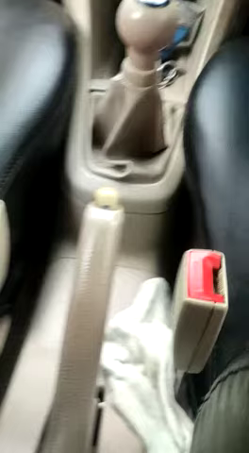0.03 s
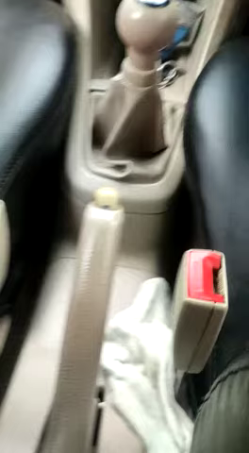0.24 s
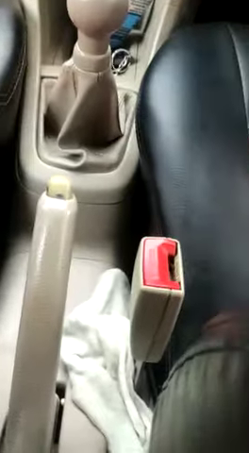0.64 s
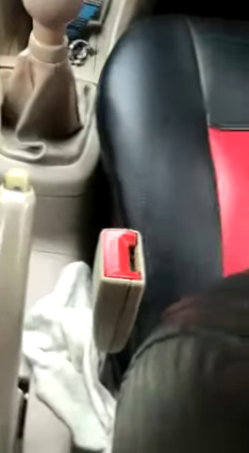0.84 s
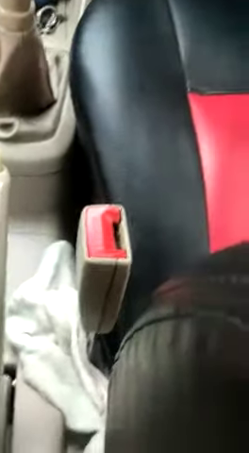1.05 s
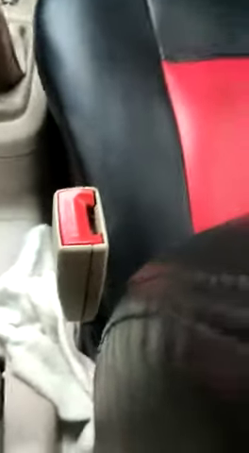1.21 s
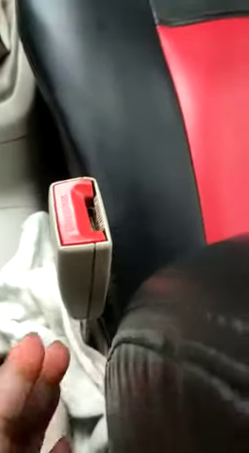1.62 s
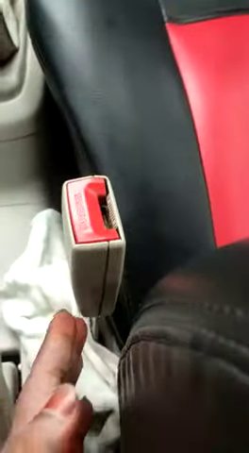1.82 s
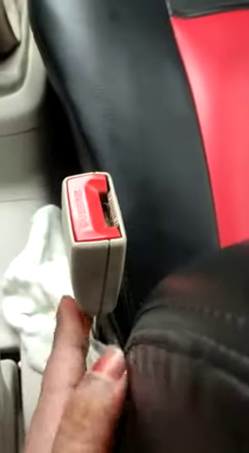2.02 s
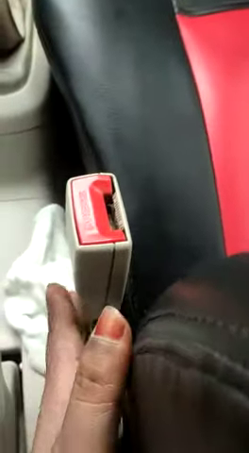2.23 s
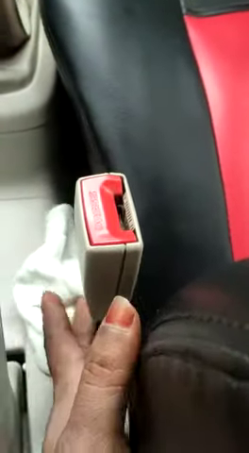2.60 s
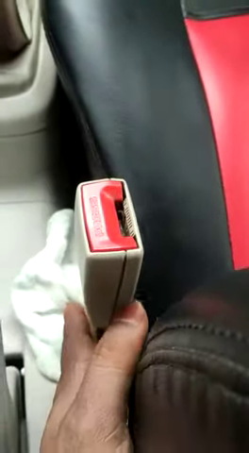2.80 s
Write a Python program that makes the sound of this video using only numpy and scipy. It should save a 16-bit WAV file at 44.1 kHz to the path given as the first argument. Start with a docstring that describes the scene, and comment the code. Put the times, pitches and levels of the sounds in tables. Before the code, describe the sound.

Soft, very close handling of a seat belt buckle inside a car. The hand-held microphone pops on, cloth and skin rub the seat, trim is knocked, the cushion thumps, and a small click ends it over faint hiss.

```python
"""A hand-held microphone pops on; then, very close, a hand reaches for a seat belt buckle in a parked car.
A sleeve hisses over the seat, skin rubs, damped trim is knocked, the cushion is bumped and a finger
sticks and slips down the plastic housing. The buckle ticks, then clicks against its stalk, which hums.
Under it all lie a quiet cabin hiss and the low sway of the microphone."""
import sys
import numpy as np
from scipy import signal
from scipy.fft import rfft
from scipy.io import wavfile

SR = 44100
rng = np.random.default_rng(int(sys.argv[2]) if len(sys.argv) > 2 else 0)


def digitize_waveform(pressure):
    """Quantize a signal to 16-bit integers and store it at the path in sys.argv[1].

    Rows of a 2-D input are taken as channels; values are limited to [-1, 1].
    """
    field = np.atleast_2d(pressure).T
    bounded = np.clip(field, -1, 1)
    quanta = np.round(bounded * 32767).astype(np.int16)
    wavfile.write(sys.argv[1], SR, quanta)


N = 130095
TIME = np.arange(N) / SR


def from_db(db):
    """Decibels to gain."""
    return 10 ** (np.asarray(db) / 20)


def rms_one(x):
    """Scale to unit rms."""
    return x / np.sqrt(np.mean(x ** 2) + 1e-20)


def fader(points):
    """Gain over time from (time_s, level_db) points."""
    return from_db(np.interp(TIME, *np.transpose(points)))


def filtered(x, hz, kind, order=2):
    """Butterworth filter."""
    return signal.sosfilt(signal.butter(order, hz, kind, fs=SR, output="sos"), x + 1e-18)


def resonance(x, hz, q):
    """The band of x around one resonant peak."""
    return signal.lfilter(*signal.iirpeak(hz, q, fs=SR), x)


def steep_cut(x, hz):
    """Remove everything above hz."""
    taps = signal.firwin(301, hz, window=("kaiser", 8), fs=SR)
    return signal.fftconvolve(x, taps[None], mode="same")


def coloured(x, eq):
    """Shape x with (freq_hz, gain_db) points and roll off the bass below them; unit rms."""
    hz, db = np.transpose(eq)
    freqs = np.maximum(np.arange(N // 2 + 1) * SR / N, 1)
    gain = from_db(np.interp(np.log(freqs), np.log(hz), db))
    gain /= np.sqrt(1 + (hz[0] / 2 / freqs) ** 4)
    return rms_one(np.fft.irfft(rfft(x) * gain, N))


def drift(hz):
    """Slow random motion of unit rms."""
    return rms_one(filtered(rng.standard_normal(N + SR), hz, "low")[SR:])


def age(start_s):
    """Seconds since a contact, zero before it."""
    return np.maximum(TIME - start_s, 0)


def ring(start_s, hz, t60_s):
    """A struck, damped sine."""
    t = age(start_s)
    return np.sin(2 * np.pi * hz * t) * np.exp(-np.minimum(np.log(1000) * t / t60_s, 20))


def burst(start_s, decay_s):
    """Noise that starts sharply and dies away."""
    return rng.standard_normal(N) * (TIME >= start_s) * np.exp(-np.minimum(age(start_s) / decay_s, 20))


def cabin(hiss_db=-74.5, hollow_db=-78.5):
    """Room tone: a steady hiss with a faint hollow resonance of the cabin."""
    # colour of the hiss: freq_hz, gain_db
    eq = [(100, 0.5), (250, -5), (400, -3), (500, -12), (620, -16.5), (1000, -12), (1500, -20), (4000, -20),
          (8000, -30)]
    hollow = rms_one(resonance(rng.standard_normal(N), hz=459, q=8.3))
    hiss = coloured(rng.standard_normal(N), eq)
    return from_db(hiss_db) * hiss + from_db(hollow_db) * hollow


def handling(sway_db=-41, fade_db_per_s=4.5):
    """The microphone sways, less as the hand settles, and the grip rumbles through its body."""
    # swells of the rumble: time_s, level_db
    envelope = [(.41, -72.5), (.5, -69), (.76, -67), (.82, -63), (.95, -70), (1.08, -58.5), (1.3, -68.5),
                (1.52, -60), (1.72, -62), (1.95, -69.5), (2.05, -68.5), (2.35, -68), (2.52, -66.5),
                (2.64, -59.5), (2.77, -68), (2.87, -55.5), (2.95, -69)]
    # colour of the rumble: freq_hz, gain_db
    eq = [(40, 6.5), (70, 2.5), (140, -0.5), (220, -15), (400, -28.5), (1000, -59.5)]
    sway = filtered(drift(hz=13), 5.57, "high")
    sway = rms_one(filtered(sway, 28, "low", order=3))
    rumble = fader(envelope) * coloured(rng.standard_normal(N), eq)
    return from_db(sway_db - fade_db_per_s * TIME) * sway + rumble


def sleeve(creases_per_s=430, crease_db=-9, spread_db=7.5, gain_db=0.5):
    """Fibres hiss and tiny creases snap as the cloth slides over the seat."""
    # strokes of the sleeve: time_s, level_db
    envelope = [(.41, -81), (.45, -93), (.55, -83), (.605, -66.5), (.68, -72.5), (.75, -64.5), (.81, -80),
                (.86, -76.5), (.93, -76.5), (1.02, -84), (1.048, -67.5), (1.09, -66.5), (1.18, -67.5),
                (1.26, -75), (1.4, -64), (1.47, -65), (1.53, -74.5), (1.66, -80), (1.85, -78.5), (2.0, -84),
                (2.16, -76.5), (2.5, -87), (2.68, -78), (2.95, -83)]
    # colour of the cloth: freq_hz, gain_db
    eq = [(300, 0.5), (700, -2), (1300, -2), (2200, -1), (4000, 2.5), (5500, -1), (7200, -3.5), (9000, -2)]
    creases = (rng.random(N) < creases_per_s / SR) * rng.choice([-1, 1], N)
    strength = from_db(spread_db * np.minimum(rng.exponential(1, N), 4))
    friction = rng.standard_normal(N) + from_db(crease_db) * rms_one(creases * strength)
    return from_db(gain_db) * fader(envelope) * coloured(friction, eq)


def rubbing(grain_db=2.5, flutter_hz=45):
    """Skin drags unevenly, dull and grainy."""
    # strokes of the hand: time_s, level_db
    envelope = [(.41, -70.5), (.52, -69), (.66, -61.5), (.77, -72), (.86, -60), (.95, -66), (1.07, -64),
                (1.3, -66.5), (1.44, -65), (1.58, -66.5), (1.74, -73.5), (1.97, -76), (2.1, -69.5),
                (2.36, -69), (2.52, -75.5), (2.66, -69.5), (2.79, -74), (2.95, -74.5)]
    # colour of the rub: freq_hz, gain_db
    eq = [(130, -2.5), (220, -2.5), (420, 0.5), (650, -5.5), (1000, -11.5), (1500, -18.5), (2200, -15),
          (4000, -29), (8000, -31.5)]
    friction = rng.standard_normal(N) * from_db(grain_db * drift(flutter_hz))
    return fader(envelope) * coloured(friction, eq)


def brushes(grain_db=3, flutter_hz=90):
    """Fingertips pass over grained plastic in short, rough swells."""
    # bell-shaped strokes on the housing: centre_s, half_width_s, level_db
    strokes = [(0.399, 0.028, -69.5), (0.806, 0.024, -68.5), (0.932, 0.015, -65), (0.991, 0.0082, -67),
               (2.102, 0.027, -78.5), (2.18, 0.024, -74), (2.355, 0.058, -76.5), (2.666, 0.03, -74.5)]
    # colour of the brushing: freq_hz, gain_db
    eq = [(600, 3), (1100, 1), (2100, -3), (3000, -10), (4500, -14), (8000, -26)]
    swells = sum(from_db(db) * np.exp(-.5 * ((TIME - centre_s) / half_width_s) ** 2)
                 for centre_s, half_width_s, db in strokes)
    friction = rng.standard_normal(N) * from_db(grain_db * drift(flutter_hz))
    return swells * coloured(friction, eq)


def bumps(attack_s=0.0032, t60_s=0.092):
    """The cushion gives and wobbles for a few slow cycles."""
    # soft thumps on the cushion: start_s, level_db, pitch_hz
    thumps = [(.81, -43, 95.5), (0.824, -38.5, 60), (.865, -42, 55), (1.224, -35, 40), (1.559, -33, 60),
              (1.608, -30, 87.6), (1.624, -31.5, 71.5), (1.654, -39, 63), (1.722, -33.5, 65),
              (1.755, -28, 44), (1.867, -36.5, 53.6), (1.936, -38, 51), (2.613, -36, 49)]
    return sum(from_db(db) * ring(start_s, hz, t60_s) * (1 - np.exp(-age(start_s) / attack_s))
               for start_s, db, hz in thumps)


def trim(start_s, pitch_ratio, length_ratio):
    """Struck trim rings briefly; the small panel radiates little bass."""
    # damped panel modes: pitch_hz, gain_db, t60_s
    modes = [(207, -2.5, 0.051), (285.6, -1, 0.029), (427, -5, 0.031), (730, -13, 0.028), (883, -5, .022),
             (1940, -8.5, 0.0057)]
    panel = sum(from_db(db) * ring(start_s, hz * pitch_ratio, t60_s * length_ratio)
                for hz, db, t60_s in modes)
    return filtered(panel, 165, "high")


def knocks(crunch_db=-7, crunch_s=0.0044):
    """Each padded blow rings the trim and crunches a little; softer contacts sound darker."""
    # blows on the trim: start_s, level_db, cutoff_hz, pitch_ratio, length_ratio
    blows = [(0.6079, -41, 1500, 0.73, 1.35), (.6112, -36, 630, 1.02, 0.81), (0.6208, -48.5, 870, 0.86, 3),
             (0.8222, -55, 1490, 1.3, 0.52), (.862, -42.5, 1700, 1, 0.49), (0.886, -44.5, 1400, 0.54, 0.77),
             (.889, -29.5, 1070, 0.985, 0.85), (0.9941, -43.5, 1520, 1.0, 0.33),
             (1.003, -63, 700, 1.5, 0.68), (1.2102, -37.5, 1200, 0.84, 1.33),
             (1.259, -49.5, 2350, 1.3, 0.3), (1.444, -49, 790, 1.26, 1.1), (2.085, -52, 2200, 0.71, 0.84),
             (2.602, -47.5, 600, 0.94, 1.55), (2.611, -44, 496, 0.77, 1.26)]
    mix = np.zeros(N)
    for start_s, db, cutoff_hz, pitch_ratio, length_ratio in blows:
        body = trim(start_s, pitch_ratio, length_ratio)
        crunch = from_db(crunch_db) * burst(start_s, crunch_s * length_ratio)
        mix += from_db(db) * filtered(body + crunch, cutoff_hz, "low")
    return mix


def judder(body_db=-13, cutoff_hz=590):
    """The finger sticks and slips; each slip lets the housing spring back and lightly rings the trim."""
    # slips of the finger: start_s, level_db
    slips = [(2.3811, -43.5), (2.395, -43.5), (2.4102, -38.5), (2.425, -38.5), (2.4391, -38.5),
             (2.456, -52)]
    mix = np.zeros(N)
    for start_s, db in slips:
        spring = 2 * ring(start_s, hz=92, t60_s=0.019)
        body = from_db(body_db) * trim(start_s, pitch_ratio=0.83, length_ratio=1)
        mix -= from_db(db) * (spring + body)
    return filtered(mix, cutoff_hz, "low")


def ticks(low_hz=600, high_hz=5300):
    """Nail and plastic meet in brief, bright contacts."""
    # small dry ticks: start_s, level_db, decay_s
    contacts = [(.409, -67, 0.0042), (.8079, -70, .002), (.881, -61, 0.0042), (.889, -56, 0.002),
                (.935, -67.5, 0.012), (.9625, -53.5, .0011), (1.2068, -43.5, 0.0004), (1.211, -62, 0.0036),
                (1.2586, -57, 0.00054), (1.378, -60.5, 0.0026), (2.196, -71, 0.007),
                (2.5995, -54.5, 0.0012)]
    snaps = sum(from_db(db) * burst(start_s, decay_s) for start_s, db, decay_s in contacts)
    return 2 * filtered(snaps, [low_hz, high_hz], "band")


def buckle(start_s=2.824, ring_db=-58, crack_db=-57.5, stalk_db=-54.5, stalk_hz=308):
    """The latch cracks and rings, and the stalk below swells into a short hum."""
    # buckle modes: pitch_hz, gain_db, t60_s
    modes = [(870, -6, 0.076), (1287, 5.5, 0.041), (1448, 0.5, 0.1), (2004, -2, 0.11), (2520, -2.5, 0.054),
             (3871, -1, 0.06), (4770, -15, 0.068), (5800, -12, .06), (6191, -36, 0.1), (7000, -27, 0.052)]
    ringing = sum(from_db(db) * ring(start_s, hz, t60_s) * (-1) ** k   # alternating polarity
                  for k, (hz, db, t60_s) in enumerate(modes))
    crack = 2 * filtered(burst(start_s, decay_s=0.012), [1200, 8000], "band")
    t = age(start_s)
    swell = np.exp(-.5 * ((t - 0.039) / 0.012) ** 2)   # peaks 39 ms after the click
    hum = np.sin(2 * np.pi * stalk_hz * t) * swell
    return from_db(ring_db) * ringing + from_db(crack_db) * crack + from_db(stalk_db) * hum


def scene():
    """All sources in mono, close and dry in the padded cabin."""
    bed = cabin() + handling()
    friction = sleeve() + rubbing() + brushes()
    contacts = bumps() + knocks() + judder() + ticks() + buckle()
    return (bed + friction + contacts)[None]


def record(dry):
    """The microphone pops, stays mute a moment, then opens; its top is lifted, then cut steeply."""
    pop_s, pop_length_s, pop_db = 0.11, 0.0013, -21
    open_s, fade_in_s, lift_db = 0.4035, 0.00326, 5.5
    pop = -from_db(pop_db) * ((TIME >= pop_s) & (TIME < pop_s + pop_length_s))
    gate = np.minimum(age(open_s) / fade_in_s, 1)
    mic = steep_cut(dry * gate, hz=7920) + pop
    lift = (from_db(lift_db) - 1) * resonance(mic, hz=7500, q=1.6)
    return steep_cut(mic + lift, hz=8330)


dry = scene()
out = record(dry)
digitize_waveform(out)
```